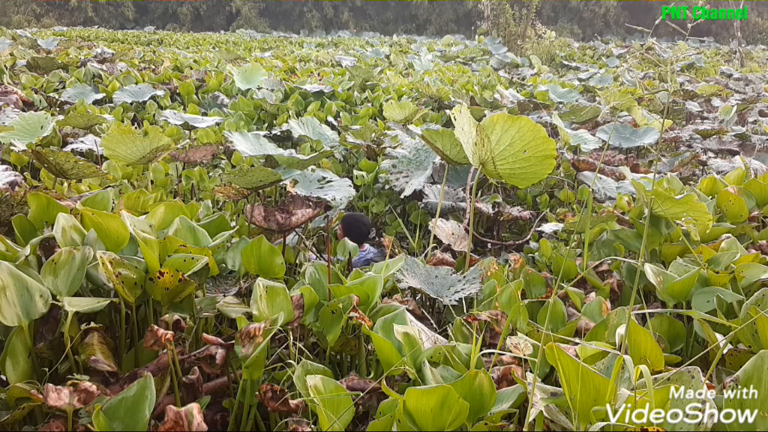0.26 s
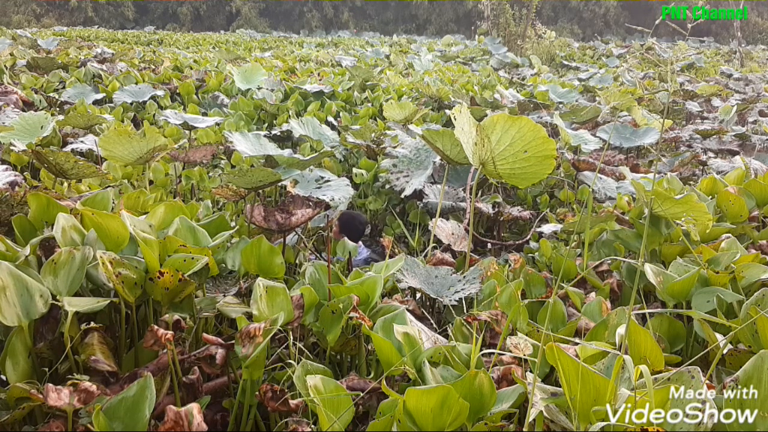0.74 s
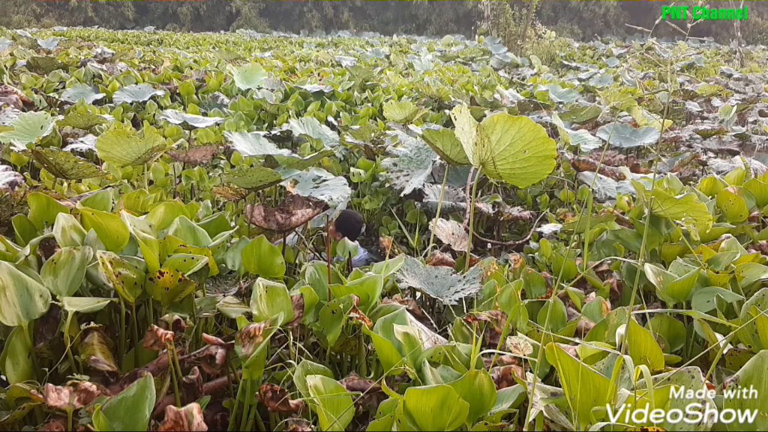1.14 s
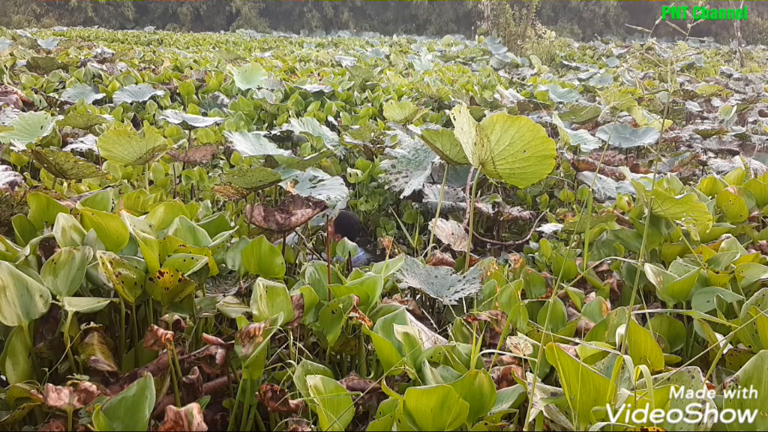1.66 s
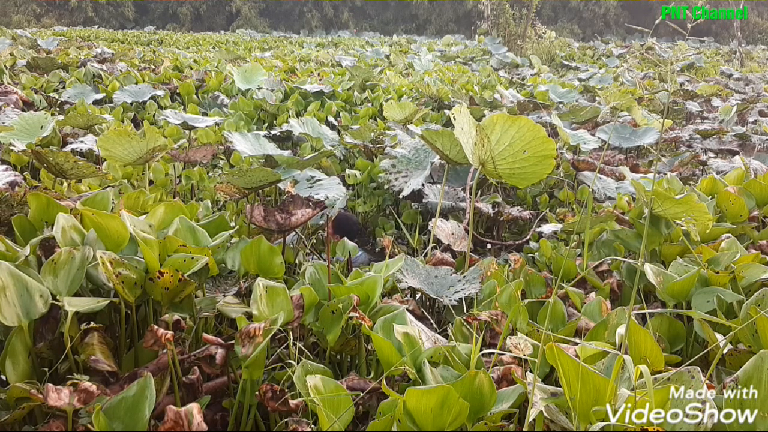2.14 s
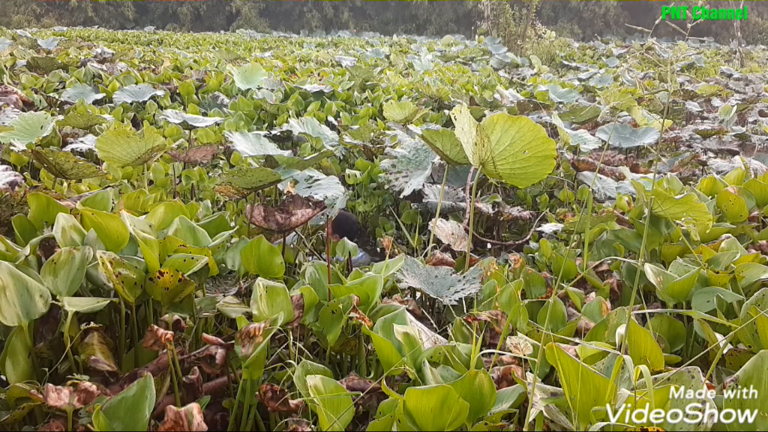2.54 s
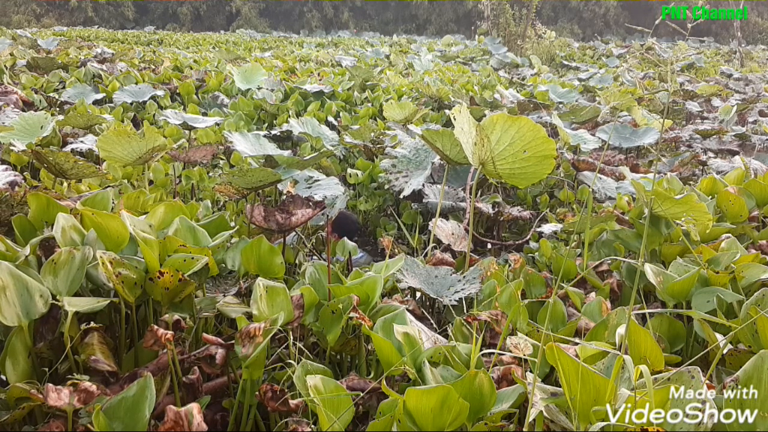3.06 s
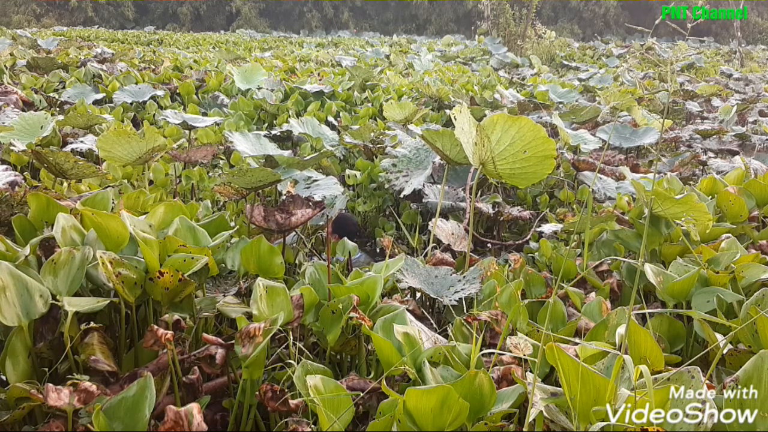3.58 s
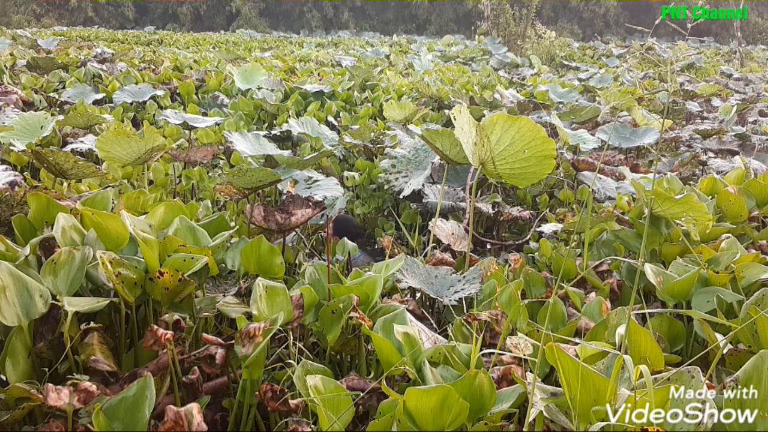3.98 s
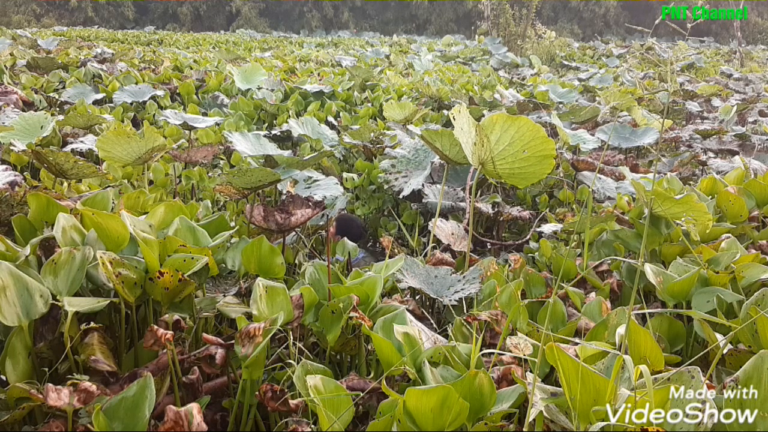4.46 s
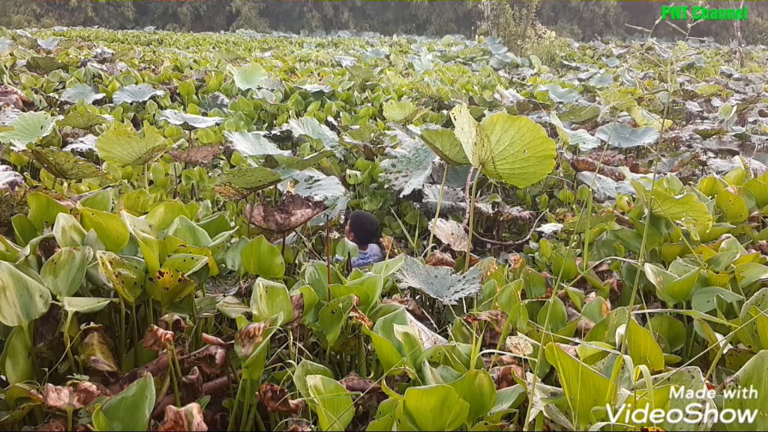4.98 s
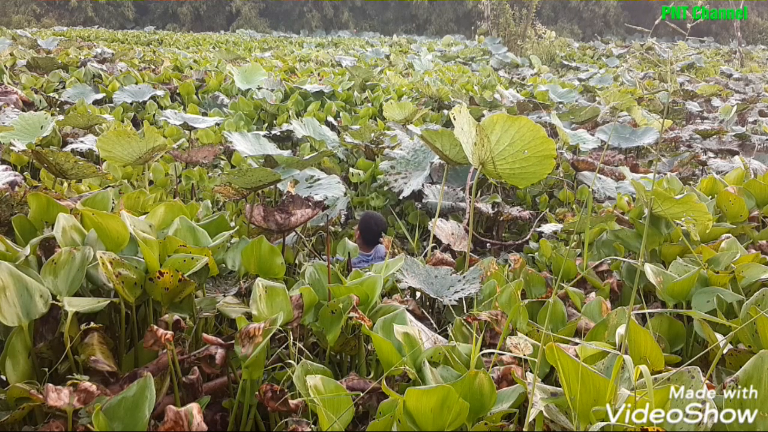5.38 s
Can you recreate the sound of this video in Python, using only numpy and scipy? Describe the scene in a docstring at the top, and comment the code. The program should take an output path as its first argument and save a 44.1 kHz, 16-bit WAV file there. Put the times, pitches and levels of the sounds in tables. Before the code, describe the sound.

Bright, high insect buzz and cricket trills fill an outdoor wetland, with soft rumble and hiss underneath. Birds lead: scratchy double chirps slightly left, quick twitters and thin high pips, all with leafy, tree-line echoes. A rooster crows far off early on, a distant engine putters throughout, falling whistles arrive after three seconds, and a dry stem ticks once late. Two spaced microphones, quiet level.

```python
"""A lotus marsh by day. Throughout: bush crickets buzz (wing strokes as clicks and noise through a wing
resonance), crickets trill (pulsed tones, banded noise), and a slow engine throbs (harmonic sines) over
rumble and high hiss (shaped noise). From the start small birds twitter, pip and call; paired harsh chirps
join at 0.4 s (pitch sweeps frayed by noise). A far rooster crows at 0.8 s, falling whistles start at 3.3 s,
a stem snaps at 4.5 s. Scattering tails carry all individual calls to two spaced microphones."""
import sys
import numpy as np
from scipy import signal
from scipy.fft import rfft, irfft
from scipy.io import wavfile
from scipy.ndimage import uniform_filter1d

SR = 44100
rng = np.random.default_rng(int(sys.argv[2]) if len(sys.argv) > 2 else 0)


def master(y):
    """Save y as 16-bit WAV."""
    cut = np.clip(np.atleast_2d(y).T, -1, 1)
    pcm = np.round(cut * 32767)  # scale
    wavfile.write(sys.argv[1], SR, pcm.astype(np.int16))


N = 247842
T = np.arange(N) / SR
FREQS = np.maximum(np.fft.rfftfreq(N, 1 / SR), 1)

# near bush cricket, wing resonance: freq_hz, relative_db
NEAR_WING_RESONANCE = [(8500, -36), (9600, -13), (10050, -8), (10310, 6.5), (10600, -3.5), (10770, 2),
                       (11100, -16), (11750, -48)]
# near bush cricket, buzzing phrases: start_s, end_s, level_db
BUZZ_PHRASES = [(-.1, .29, -60.5), (.44, 1.046, -62), (1.226, 1.843, -61.5), (1.977, 2.615, -61.5),
                (2.783, 3.458, -60), (3.605, 4.254, -61.5), (4.44, 5.04, -61.5), (5.262, 5.704, -60.5)]
# far bush crickets, wing resonance: freq_hz, relative_db
FAR_WING_RESONANCE = [(8000, -47), (9000, -25), (9450, -10.5), (9800, -4.5), (10230, 2), (10450, -0.5),
                      (10750, -1.5), (11120, -10.5), (11520, -11.5), (11750, -32)]
# crickets that stand out of the chorus: pitch_hz, pulse_rate_hz, level_db, left_minus_right_db
CRICKET_TRILLS = [(4593, 52, -75.5, -4), (4730, 38, -73.5, 3), (4910, 64, -73.5, -2)]
# cricket chorus spectrum: freq_hz, relative_db
CHORUS_SPECTRUM = [(2800, -28), (3400, -17), (4200, 0.5), (4500, 3.5), (4750, 5.5), (5000, 4.5),
                   (5280, -4.5), (5600, -51), (7000, -64)]
# harsh chirps, in pairs: start_s, top_hz, end_hz, upstroke_db, downstroke_db, lower_voice_db
HARSH_CHIRPS = [(.444, 4710, 3300, -50, -47, -56), (0.591, 4650, 3080, -55, -51.5, -58),
                (1.429, 4170, 2944, -55, -47, -52.5), (1.593, 4344, 2600, -49.5, -49, -54),
                (2.454, 5450, 3340, -55, -46.5, -52), (2.624, 4660, 3080, -51, -47, -54),
                (3.424, 4540, 3170, -51, -46, -51.5), (3.578, 4090, 2956, -52.5, -49, -57.5),
                (4.548, 4660, 3093, -48, -46, -50.5), (4.675, 4700, 2640, -48.5, -45.5, -57)]
# clearest chirp echoes: delay_s, gain_db
CHIRP_REFLECTIONS = [(.0065, -12), (.016, -13.5), (0.03, -14)]
# falling whistles: start_s, length_s, knee_hz, end_hz, level_db
FALLING_WHISTLES = [(3.258, 0.069, 3800, 3070, -60.5), (3.908, 0.074, 3806, 3033, -55),
                    (4.225, 0.075, 3860, 2936, -56.5), (4.875, 0.048, 3810, 2870, -53.5),
                    (5.195, 0.0585, 3830, 3020, -56), (5.522, 0.076, 3840, 3090, -59.5)]
# short twitters: start_s, top_hz, level_db
SHORT_TWITTERS = [(0.123, 4690, -55), (.160, 4400, -51), (1.907, 5020, -50.5), (1.937, 4330, -53.5),
                  (2.916, 5150, -52), (3.024, 4750, -51.5), (3.155, 4450, -56.5), (3.191, 4950, -55),
                  (3.668, 3000, -59), (4.362, 4250, -61.5), (5.303, 2950, -61)]
# thin high pips: start_s, top_hz, level_db
HIGH_PIPS = [(.110, 6100, -60.5), (.514, 6550, -63), (.590, 6450, -63), (.669, 5950, -57.5),
             (1.158, 6900, -67), (1.235, 5930, -59.5), (1.316, 5750, -57.5), (1.884, 6450, -61.5),
             (2.522, 6200, -61), (2.601, 6350, -56), (2.888, 6550, -63), (2.966, 6200, -59),
             (3.088, 7000, -62)]
# crow, breaking between low and high register: start_s, length_s, start_hz, held_hz, end_hz, onset_db
CROW_NOTES = [(0.815, 0.04, 665, 688, 687, -60), (0.852, 0.059, 880, 1010, 1080, -56.5),
              (0.889, 0.091, 1202, 1186, 1177, -56.5), (0.984, 0.059, 1170, 1156, 1105, -49),
              (1.033, 0.064, 1000, 1000, 976, -56.5), (1.156, 0.073, 965, 1015, 1007, -56),
              (1.299, 0.052, 932, 996, 1035, -55), (1.32, 0.11, 1105, 1152, 1062, -52)]
# faint calls from across the marsh: start_s, length_s, top_hz, level_db
DISTANT_CALLS = [(.12, 0.75, 1780, -76), (1.05, 0.71, 1880, -77.5), (1.87, 0.072, 2320, -71),
                 (1.80, 0.75, 2170, -75), (3.14, 0.08, 1730, -74), (3.61, 0.053, 810, -63),
                 (5.48, 0.2, 745, -64)]
# engine speed: time_s, firing_rate_hz
FIRING_RATE = [(0, 24.7), (1.0, 26.6), (1.65, 24.7), (2.3, 23.7), (5.62, 23.9)]
# two strongest exhaust harmonics, fading over the water: time_s, fifth_db, sixth_db
STRONG_HARMONICS = [(0, -63, -51), (.3, -48, -54), (.95, -51, -62.5), (1.2, -57.5, -65), (1.7, -44.5, -61),
                    (2.25, -51.5, -60.5), (2.6, -52.5, -50), (3.5, -56.5, -50.5), (3.9, -55.5, -53),
                    (4.25, -50, -50.5), (4.8, -58, -63.5), (5.62, -67, -63)]
# weaker exhaust harmonics: multiple, mean_level_db
WEAK_HARMONICS = [(3, -67.5), (4, -67), (7, -67), (11, -75), (12, -77), (14, -72.5)]
# low throb under the engine, swelling once at 1.7 s: time_s, gain_db
ENGINE_LOW_GAIN = [(0, -1.5), (1.1, 0), (1.45, 1), (1.68, 7), (1.9, 0), (2.6, -1), (4.0, -2.5), (5.62, 0)]
# distant rumble and air, spectrum: freq_hz, relative_db
AIR_SPECTRUM = [(25, -31), (45, -7.5), (72, 1.5), (120, 3), (170, 1), (215, -8), (350, -8.5), (600, -14),
                (1000, -20.5), (1600, -27), (2500, -32), (6600, -34), (7100, -38), (14500, -53.5)]
# likeness of the air at the two microphones: freq_hz, correlation
AIR_CORRELATION = [(100, 0.95), (200, 0.83), (400, 0.73), (700, 0.25), (1200, -0.28), (1900, -0.23),
                   (3400, 0.094)]
# midrange murmur of the distance: time_s, gain_db
MIDRANGE_GAIN = [(0, -.5), (1.5, 2), (2.4, 2.5), (3.2, -3), (4.05, 0.8), (4.55, -2.3), (5.62, 1.5)]
# high hiss level: time_s, gain_db
HIGH_HISS_GAIN = [(0, -4), (.6, 4), (.9, -5), (1.8, 2.5), (2.3, -2), (3.1, 4), (3.95, -2), (4.4, 5.5),
                  (5.62, 0)]

WING_STROKE_HZ, PHRASE_ATTACK_S, PHRASE_RELEASE_S = 136.5, 0.023, 0.03
CHIRP_RISE_S, CHIRP_TURN_S, CHIRP_FALL_S = 0.02386, .027, .026  # upstroke; moment of the top; downstroke
CHIRP_START_HZ, CHIRP_OPEN_HZ = 3095, 4210  # upstroke, first and last pitch
CHIRP_FLICK_HZ = 2602  # entry of the second voice
TWITTER_S, TWITTER_START_RATIO, TWITTER_END_RATIO = .02, .87, 0.76  # ratios to the top pitch
PIP_S, PIP_START_RATIO, PIP_END_RATIO = .025, .7, 0.9
FAR_END_RATIO = 0.96  # first and last pitch
CROW_SCOOP_S, CROW_FALL_S = 0.043, 0.061  # pitch slides in and out
CROW_ATTACK_S, CROW_RELEASE_S, CROW_SAG_DB_PER_S = 0.025, 0.014, -15
ENGINE_FOLLOW = 0.11  # share of the fifth's dB fading that weaker harmonics follow
RUMBLE_DB, RUMBLE_EBB_DB_PER_S = 0.85, -0.5
TOP_HZ = 15400


def undb(db):
    """Decibels to gain."""
    return 10 ** (np.asarray(db) / 20)


def level(x, db):
    """Scale to an rms level."""
    return x * undb(db) / np.sqrt(np.mean(x ** 2))


def pan(db):
    """Left and right gains for a left-minus-right level difference."""
    return undb(np.array([[db], [-db]]) / 2)


def curve(points):
    """Time table, joined linearly."""
    return np.interp(T, *np.transpose(points))


def across(points):
    """Frequency table, joined on a log axis."""
    hz, value = np.transpose(points)
    return np.interp(np.log(FREQS), np.log(hz), value)


def colour(x, points):
    """Filter by a spectrum of freq_hz, gain_db."""
    return irfft(rfft(x) * undb(across(points)), N)


def resonate(x, hz, width_hz):
    """Steep resonance: a squared band-pass response."""
    return irfft(rfft(x) / (1 + 1j * (FREQS / hz - hz / FREQS) * hz / width_hz) ** 2, N)


def below(x, hz):
    """Part of a sound under a frequency."""
    return irfft(rfft(x) / (1 + (FREQS / hz) ** 4), N)


def walk(rate_hz):
    """Smoothed random curve with a spread near 1."""
    k = max(int(SR / rate_hz), 1)
    steps = np.repeat(rng.standard_normal(N // k + 1), k)
    return 1.31 * uniform_filter1d(uniform_filter1d(steps, k), k)[:N]


def tone(hz):
    """Sine of rms 1 along a pitch curve."""
    return np.sqrt(2) * np.sin(2 * np.pi * (np.cumsum(hz) / SR + rng.random()))


def add(track, start_s, sound):
    """Mix a sound into a track."""
    i = max(int(start_s * SR), 0)
    track[i:i + len(sound)] += sound[:max(N - i, 0)]


def sweep(length_s, from_hz, to_hz, bend):
    """Pitch glide; a bend over 1 moves fast at first and settles."""
    return to_hz + (from_hz - to_hz) * np.linspace(1, 0, max(int(length_s * SR), 64)) ** bend


def rasp(count, depth, rate_hz):
    """Gain of an irregularly fluttering voice; frays its line into a band."""
    flutter = uniform_filter1d(rng.standard_normal(count), int(SR / rate_hz)) * np.sqrt(SR / rate_hz)
    return (1 + depth * flutter) / np.sqrt(1 + depth ** 2)


def stroke(hz, waver, harsh):
    """One voice along a pitch curve; it swells, fades and frays."""
    count = len(hz)
    swell = np.abs(np.sin(np.pi * np.linspace(0, 1, count))) ** .65
    return tone(hz * (1 + waver * walk(636)[:count])) * swell * rasp(count, harsh, 1100)


def arch(length_s, start_hz, top_hz, end_hz, waver, waver_rate_hz):
    """One note: pitch climbs and falls, wavering as the syrinx swells and closes."""
    u = np.linspace(0, 1, max(int(length_s * SR), 64))
    hz = np.interp(u, [0, .5, 1], [start_hz, top_hz, end_hz])
    hz = uniform_filter1d(hz, len(u) // 6, mode="nearest")
    knots = rng.standard_normal(int(length_s * waver_rate_hz) + 2)
    hz = hz * (1 + waver * np.interp(u, np.linspace(0, 1, len(knots)), knots))
    return tone(hz) * np.sqrt(np.abs(np.sin(np.pi * u)))


def notes(table, start_ratio, end_ratio, waver, waver_rate_hz, harsh, harsh_rate_hz):
    """Single-voiced notes of one shape, from rows of start_s, length_s, top_hz, level_db."""
    out = np.zeros(N)
    for start_s, length_s, top_hz, db in table:
        note = arch(length_s, start_ratio * top_hz, top_hz, end_ratio * top_hz, waver, waver_rate_hz)
        add(out, start_s, undb(db) * note * rasp(len(note), harsh, harsh_rate_hz))
    return out


def outdoors(x, lag_ms, pan_db, leaves_db, leaves_t60, trees_db, trees_t60):
    """Direct path, left delayed by lag_ms, plus tails scattered by leaves and by the tree line (t60 in s)."""
    t = T[:SR]
    tails = 0
    for db, t60 in (leaves_db, leaves_t60), (trees_db, trees_t60):
        tail = rng.standard_normal((2, SR)) * np.exp(-np.log(1000) * t / t60) * (1 - np.exp(-t / .007))
        tails = tails + undb(db) * tail / np.sqrt(np.sum(tail ** 2) / 2)
    late = irfft(rfft(x) * np.exp(-2j * np.pi * FREQS * lag_ms / 1000), N)
    scattered = signal.fftconvolve(x[None], tails, axes=1)[:, :N]
    power = 1 + undb(leaves_db) ** 2 + undb(trees_db) ** 2  # the three paths share the energy
    return pan(pan_db) * (np.array([late, x]) + scattered) / np.sqrt(power)


def near_bush_cricket(stroke_share=0.35, scrape_db=-3, drift=.004, jitter=.003):
    """Close singer, buzzing in phrases: each wing stroke snaps, rasps the file and rings the wing."""
    turns = np.cumsum(WING_STROKE_HZ * (1 + drift * walk(5) + jitter * walk(130))) / SR
    snaps = np.diff(np.floor(turns), prepend=0)
    scrape = np.exp(-(turns % 1) / stroke_share) * rng.standard_normal(N)
    buzz = level(colour(level(snaps, 0) + level(scrape, scrape_db), NEAR_WING_RESONANCE), 0)
    effort = np.zeros(N)
    for start_s, end_s, db in BUZZ_PHRASES:
        ramps = np.minimum((T - start_s) / PHRASE_ATTACK_S, (end_s - T) / PHRASE_RELEASE_S)
        effort += undb(db) * np.clip(ramps, 0, 1)
    return outdoors(buzz * effort * undb(2.0 * walk(12)), lag_ms=0.255, pan_db=-4.0,
                    leaves_db=0.5, leaves_t60=0.03, trees_db=-11, trees_t60=0.51)


def far_bush_crickets(db=-59.0, pan_db=-1):
    """Far bush crickets merge into one shimmering noise band."""
    band = level(colour(rng.standard_normal((2, N)), FAR_WING_RESONANCE), db)
    return band * pan(pan_db) * undb(0.21 * walk(2.8) + 0.59 * walk(45))


def cricket_trills(sag=0.044, swell_db=3.0):
    """Each wing closing rings one short, slightly falling tone; singers swell independently."""
    out = 0
    for hz, rate_hz, db, pan_db in CRICKET_TRILLS:
        cycle = np.cumsum(rate_hz * (1 + .05 * walk(20))) / SR % 1
        pitch = hz * (1 + sag * (.5 - cycle) + .008 * walk(60))
        pulses = np.sin(np.pi * cycle) ** 2 * tone(pitch)
        song = level(pulses * undb(swell_db * walk(4.97)), db)
        out = out + outdoors(song, lag_ms=0, pan_db=pan_db,
                             leaves_db=0, leaves_t60=.06, trees_db=-6, trees_t60=.5)
    return out


def cricket_chorus():
    """Overlapping trills flutter as one noise band; steady resonant bands sing higher on either side."""
    chorus = level(colour(rng.standard_normal((2, N)), CHORUS_SPECTRUM), -65.0)
    out = chorus * undb(0.67 * walk(35) + .5 * walk(3.9)) * pan(-2.3)
    for hz, width_hz, db, pan_db in (6520, 870, -78, -6), (7484, 220, -78.5, 9.1), (8610, 500, -85.0, 11.3):
        out = out + level(resonate(rng.standard_normal((2, N)), hz, width_hz), db) * pan(pan_db)
    return out


def chirper(flick_s=.01, lower_ratio=.84, upper_ratio=1.17, upper_db=-9, bend=1.302, open_bend=1.15):
    """One syrinx side sweeps up, the other flicks up across it; both fall under a hoarse edge."""
    out = np.zeros(N)
    clear, hoarse = dict(waver=.02, harsh=.48), dict(waver=.04, harsh=1.2)
    for start_s, top_hz, end_hz, up_db, down_db, lower_db in HARSH_CHIRPS:
        turn_s = start_s + CHIRP_TURN_S
        rise = sweep(CHIRP_RISE_S, CHIRP_START_HZ, CHIRP_OPEN_HZ, open_bend)
        fall = sweep(CHIRP_FALL_S, top_hz, end_hz, bend)
        peak = np.concatenate([sweep(flick_s, CHIRP_FLICK_HZ, top_hz, 0.98), fall])
        lower = sweep(CHIRP_FALL_S, lower_ratio * top_hz, .9 * end_hz, bend)
        add(out, start_s, undb(up_db) * stroke(rise, **clear))
        add(out, turn_s - flick_s, undb(down_db) * stroke(peak, **clear))
        add(out, turn_s, undb(lower_db) * stroke(lower, **clear))
        add(out, turn_s - flick_s, undb(down_db + upper_db) * stroke(upper_ratio * peak, **hoarse))
    # throat
    out = colour(out, [(1700, -3), (2700, -4.0), (4800, -2), (5700, -4), (8500, -15)])
    # big leaves close to the bird answer first, the bank a little later
    out = out + sum(undb(db) * np.interp(T - lag_s, T, out, left=0) for lag_s, db in CHIRP_REFLECTIONS)
    return outdoors(out, lag_ms=0.29, pan_db=-4.0,
                    leaves_db=-3.3, leaves_t60=0.16, trees_db=-4.5, trees_t60=0.8)


def whistler(start_hz=4500, drop_s=0.00504, upper_ratio=1.2, upper_db=-11, fade_db=-5):
    """Slightly hoarse note drops fast, then slides down fading, under a weak second voice."""
    out = np.zeros(N)
    for start_s, length_s, knee_hz, end_hz, db in FALLING_WHISTLES:
        t = np.arange(int(length_s * SR)) / SR
        drop = (start_hz - knee_hz) * np.exp(-t / drop_s)
        hz = knee_hz + drop + (end_hz - knee_hz) * (t / length_s) ** .8
        fade = undb(fade_db * (t / length_s - .5))
        add(out, start_s, undb(db) * fade * stroke(hz, waver=.01, harsh=.35))
        add(out, start_s, undb(db + upper_db) * stroke(upper_ratio * hz, waver=.035, harsh=1.2))
    return outdoors(out, lag_ms=0.23, pan_db=-3.0,
                    leaves_db=-4.5, leaves_t60=.2, trees_db=-3.5, trees_t60=0.72)


def twitters():
    """Short single-voiced notes: a small climb, a larger fall."""
    rows = [(start_s, TWITTER_S, hz, db) for start_s, hz, db in SHORT_TWITTERS]
    out = notes(rows, TWITTER_START_RATIO, TWITTER_END_RATIO,
                waver=0.039, waver_rate_hz=550, harsh=0.42, harsh_rate_hz=1200)
    return outdoors(out, lag_ms=0.26, pan_db=-2.0,
                    leaves_db=-7.0, leaves_t60=0.075, trees_db=-0.5, trees_t60=0.34)


def pips():
    """Thin high notes sweep up from well below and fall only a little."""
    rows = [(start_s, PIP_S, hz, db) for start_s, hz, db in HIGH_PIPS]
    out = notes(rows, PIP_START_RATIO, PIP_END_RATIO,
                waver=0.032, waver_rate_hz=540, harsh=0.71, harsh_rate_hz=990)
    return outdoors(out, lag_ms=-0.492, pan_db=-1.5,
                    leaves_db=-4, leaves_t60=0.27, trees_db=-7, trees_t60=0.4)


def rooster(rough=0.007, octave_db=-29, quaver_db=1.16):
    """Notes slide in, hold and slide out; one strong hoarse partial and its faint octave carry this far."""
    out = np.zeros(N)
    for start_s, length_s, start_hz, held_hz, end_hz, db in CROW_NOTES:
        since, left = T - start_s, start_s + length_s - T
        scoop = np.clip(1 - since / CROW_SCOOP_S, 0, 1)
        fall = np.clip(1 - left / CROW_FALL_S, 0, 1)
        pitch = held_hz + (start_hz - held_hz) * scoop * (2 - scoop) + (end_hz - held_hz) * fall
        pitch = pitch * (1 + rough * walk(250))
        effort = np.clip(np.minimum(since / CROW_ATTACK_S, left / CROW_RELEASE_S), 0, 1)
        effort = effort * undb(db + CROW_SAG_DB_PER_S * np.clip(since, 0, length_s))
        voice = tone(pitch) + undb(octave_db) * tone(2 * pitch)
        out += effort * undb(quaver_db * walk(89.5)) * voice
    return outdoors(out, lag_ms=-.11, pan_db=-.5,
                    leaves_db=-9.5, leaves_t60=.22, trees_db=-8.5, trees_t60=1.0)


def far_calls():
    """Faint, nearly level notes, blurred by pitch waver and flutter."""
    out = notes(DISTANT_CALLS, FAR_END_RATIO, FAR_END_RATIO,
                waver=0.059, waver_rate_hz=260, harsh=0.83, harsh_rate_hz=280)
    return outdoors(out, lag_ms=0, pan_db=-9.0,
                    leaves_db=-1.0, leaves_t60=0.11, trees_db=-2.5, trees_t60=0.57)


def stem_tick(start_s=4.458, db=-58, decay_s=0.0076):
    """A dry stem snaps once: a decaying noise burst, band-shaped."""
    out, t = np.zeros(N), T[:SR // 20]
    add(out, start_s, rng.standard_normal(len(t)) * np.exp(-t / decay_s))
    snap = undb(db) * colour(out, [(2400, -22), (3700, 3), (5800, 16.0), (7200, 2), (10000, -22)])
    return outdoors(snap, lag_ms=0, pan_db=-3,
                    leaves_db=-10, leaves_t60=.05, trees_db=-16, trees_t60=.4)


def engine(lope_db=2.0, fading_db=0.7):
    """Low exhaust harmonics of a far one-cylinder engine; uneven firings swell them together."""
    rate_hz = curve(FIRING_RATE)
    time_s, *fades = np.transpose(STRONG_HARMONICS)
    fifth_db, sixth_db = (np.interp(T, time_s, db) for db in fades)
    out = np.zeros(N)
    for k, db in (5, fifth_db), (6, sixth_db):
        out += tone(k * rate_hz) * undb(db + fading_db * walk(7))
    follow_db = ENGINE_FOLLOW * (fifth_db - fifth_db.mean())
    for k, db in WEAK_HARMONICS:
        out += tone(round(k) * rate_hz) * undb(db + follow_db + 0.38 * walk(4.2))
    return out * undb(lope_db * walk(24.03)) * pan(-1.6)


def air():
    """Low throb and far rumble, alike at both microphones, under diffuse hiss; each range has its own gain."""
    mid, side = rfft(rng.standard_normal((2, N)))
    alike = np.clip(across(AIR_CORRELATION), -1, 1)
    pair = irfft(mid * np.sqrt(1 + alike) + np.array([[1], [-1]]) * side * np.sqrt(1 - alike), N)
    sound = level(colour(pair, AIR_SPECTRUM), -51.5)
    lowest, low, middle = below(sound, 110), below(sound, 530), below(sound, 4100)
    throb = lowest * undb(curve(ENGINE_LOW_GAIN))
    rumble = (low - lowest) * undb(RUMBLE_DB + RUMBLE_EBB_DB_PER_S * T)
    midrange = (middle - low) * undb(curve(MIDRANGE_GAIN) + 1.75 * walk(7))
    hiss = (sound - middle) * undb(curve(HIGH_HISS_GAIN) + 0.68 * walk(4.0))
    return (throb + rumble) * pan(-0.9) + midrange * pan(-2.4) + hiss * pan(-4.5)


def scene():
    """Insects, birds and the distance together."""
    insects = near_bush_cricket() + far_bush_crickets() + cricket_trills() + cricket_chorus()
    birds = chirper() + whistler() + twitters() + pips() + rooster() + far_calls()
    return insects + birds + stem_tick() + engine() + air()


def record(dry):
    """The recorder cuts the top: steep elliptic low-pass."""
    return signal.sosfilt(signal.ellip(8, .2, 70, TOP_HZ, fs=SR, output="sos"), dry)


dry = scene()
out = record(dry)
master(out)
```